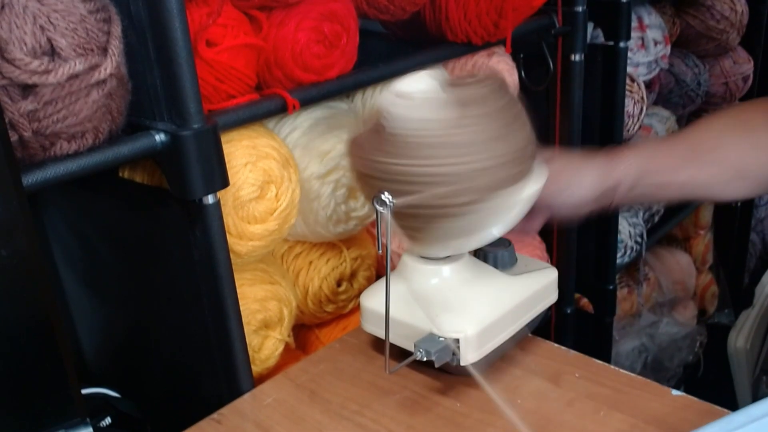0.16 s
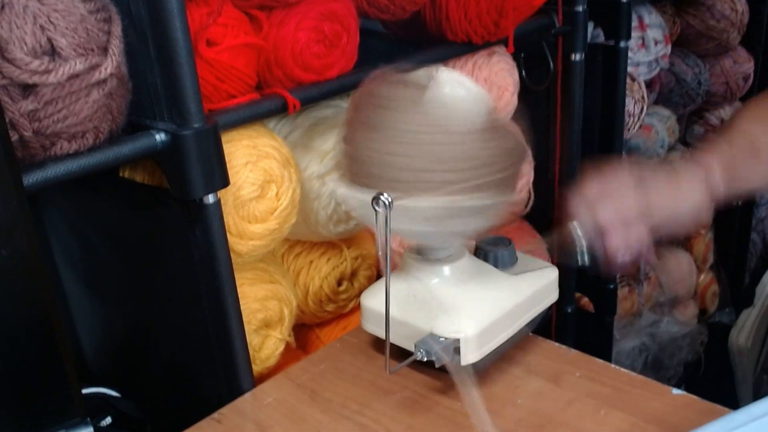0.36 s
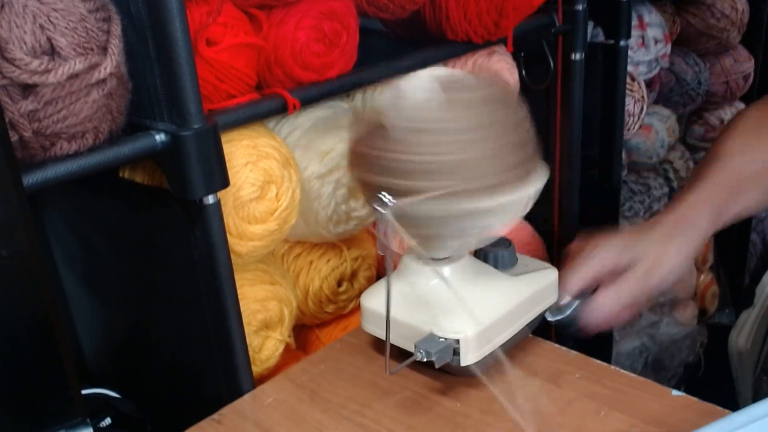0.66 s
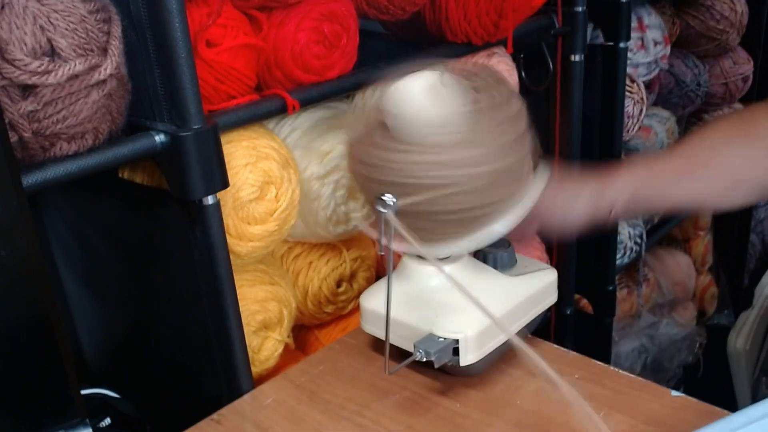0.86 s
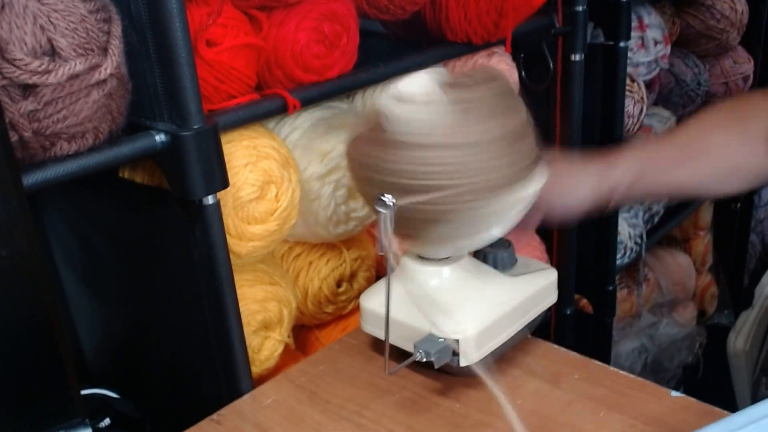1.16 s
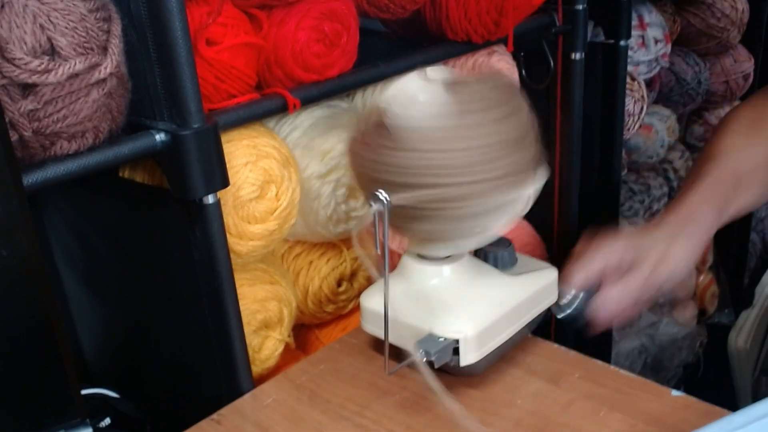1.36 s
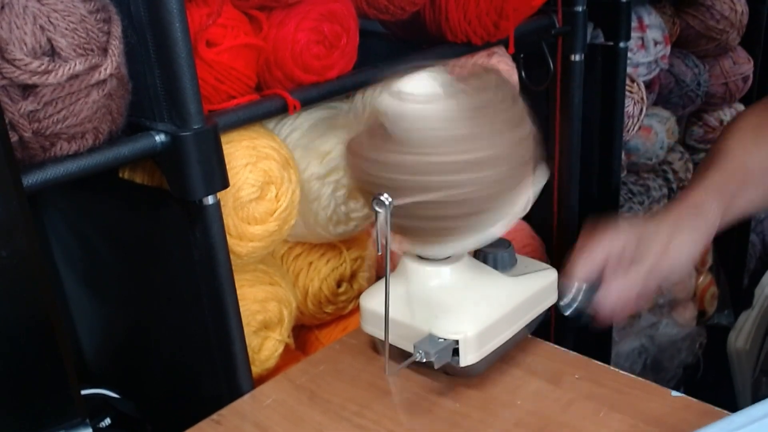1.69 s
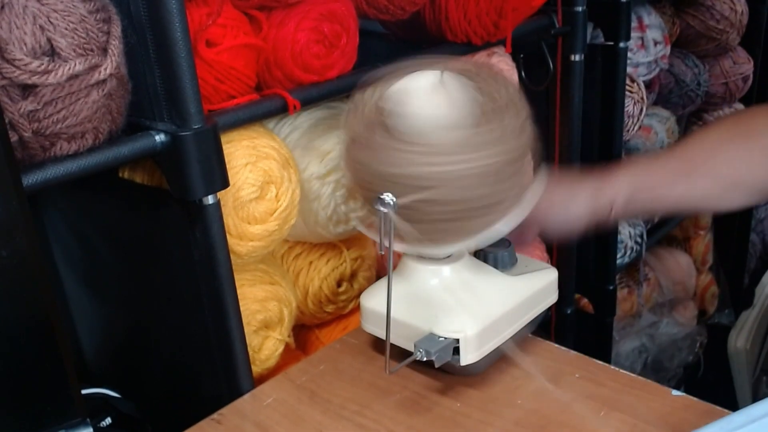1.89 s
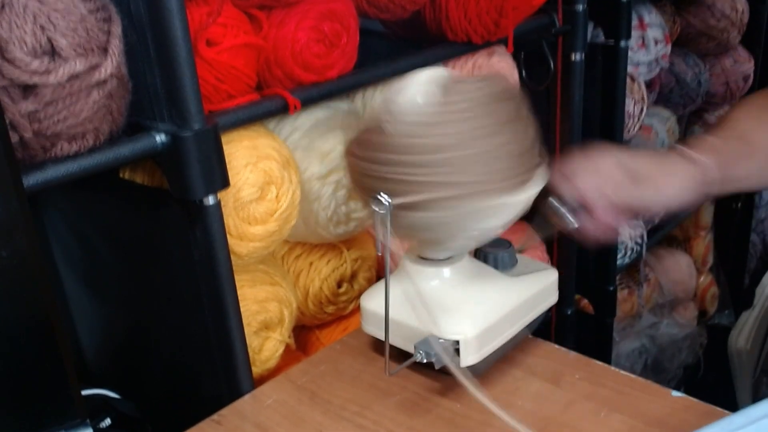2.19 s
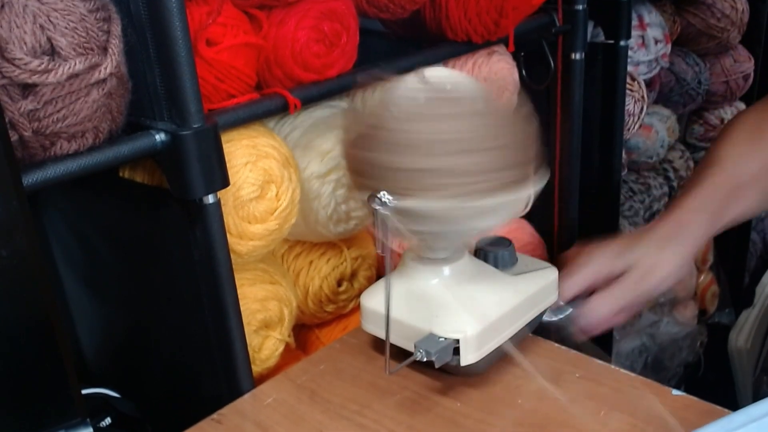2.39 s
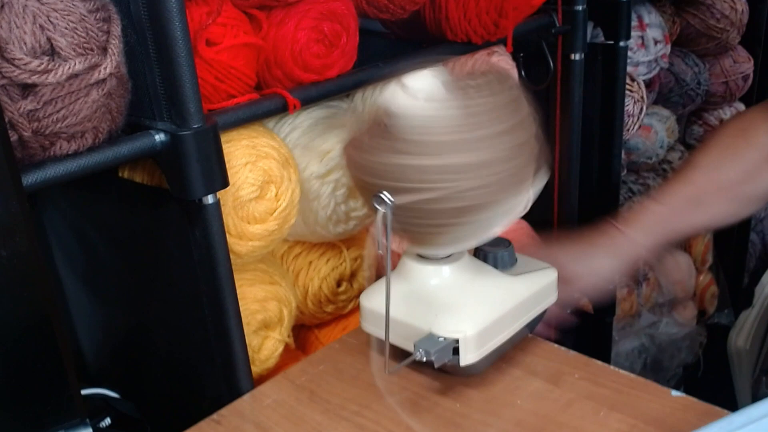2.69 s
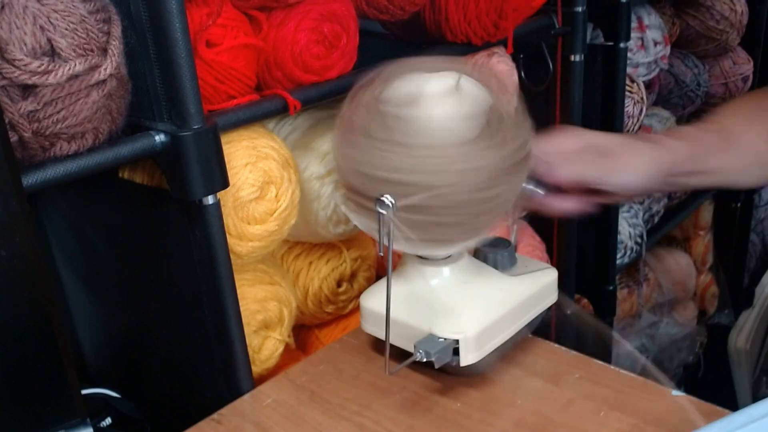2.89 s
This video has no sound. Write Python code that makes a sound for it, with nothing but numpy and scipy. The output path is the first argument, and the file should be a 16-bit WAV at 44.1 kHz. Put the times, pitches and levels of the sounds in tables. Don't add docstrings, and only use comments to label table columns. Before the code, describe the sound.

Close, narrow, slightly dull capture of a plastic winder on a wooden table: throbbing gear hum, rumble, dry ticking rattles and a few knocks midway, thinning and quietening towards the end without stopping.

```python
import sys
import numpy as np
from scipy import signal
from scipy.io import wavfile
from scipy.ndimage import uniform_filter1d

SR = 44100
rng = np.random.default_rng(int(sys.argv[2]) if len(sys.argv) > 2 else 0)


def voltage_ratio(decibels):
    exponent = np.asarray(decibels, float) / 20
    return 10 ** exponent


def digitize_waveform(pressure):
    field = np.atleast_2d(pressure).T
    bounded = np.clip(field, -1, 1)
    quanta = np.round(bounded * 32767).astype(np.int16)
    wavfile.write(sys.argv[1], SR, quanta)


N = 134505

# (time [s], level [dB])
CRANK_EFFORT = [
    (0, -44.5),
    (.4, -51),
    (1.4, -50),
    (1.698, -55.5),
    (2.502, -57.5),
    (3.05, -56),
]
# (time [s], level [dB], tooth rate [Hz], length [s])
BALL_SWINGS = [(0.137, -34.5, 145, 0.017), (0.272, -32, 165.1, 0.093), (0.333, -31, 171.6, 0.032),
               (0.387, -31, 172.9, 0.02), (0.46, -49, 139.9, 0.026), (0.53, -39, 161, 0.021),
               (0.604, -30, 171.3, 0.056), (0.689, -30, 176.5, 0.029), (0.753, -32, 180.4, 0.025),
               (0.795, -40, 159.9, 0.015), (0.825, -54.5, 151.8, 0.017), (0.896, -34, 171.1, 0.026),
               (0.939, -26, 187.4, 0.029), (1.025, -27.5, 180.6, 0.027), (1.092, -26, 192.4, 0.027),
               (1.14, -39.5, 170.6, 0.015), (1.2, -40, 141.5, 0.068), (1.262, -36.5, 167.4, 0.018),
               (1.301, -27, 180.5, 0.027), (1.371, -29, 180.3, 0.036), (1.439, -29, 182.1, 0.037),
               (1.48, -41.5, 185.6, 0.015), (1.519, -42, 145, 0.027), (1.563, -38.5, 153.2, 0.02),
               (1.648, -30.5, 171.3, 0.043), (1.718, -35, 169.7, 0.036), (1.808, -35.5, 173.9, 0.021),
               (1.858, -50.5, 135.7, 0.03), (1.93, -46.5, 149.9, 0.014), (2.018, -32.5, 176, 0.046),
               (2.084, -28.5, 191.2, 0.018), (2.149, -44, 175.7, 0.043), (2.211, -57, 134.4, 0.016),
               (2.276, -46.5, 152.9, 0.033), (2.384, -34, 172.5, 0.045), (2.461, -38.5, 170.4, 0.033),
               (2.529, -34, 187, 0.019), (2.648, -50, 141, 0.042), (2.751, -38, 172.5, 0.052),
               (2.809, -41.5, 173.2, 0.035), (2.88, -50, 169.7, 0.016), (2.971, -55, 152.2, 0.04)]
# (time [s], level [dB], length [s])
WHIRRS = [
    (.12, -52.5, 0.023),
    (0.588, -50, 0.061),
    (.87, -50, .07),
    (1.188, -57, .04),
    (1.873, -52, 0.027),
    (2.24, -52.5, .04),
]
# (time [s], peak level [dB], pitch [Hz])
BASE_RINGS = [(0.049, -39, 627), (0.133, -34.5, 634.7), (0.162, -34.5, 632), (0.2, -37.5, 643.4),
              (0.264, -33, 678), (0.339, -41.5, 719), (0.484, -45, 611.4), (0.521, -36, 703),
              (0.573, -33, 632), (0.669, -37.5, 623), (0.81, -45, 731), (0.935, -38, 770),
              (0.994, -37, 661), (1.083, -47.5, 789), (1.192, -43.5, 669.2), (1.24, -36.5, 675),
              (1.277, -35, 641.4), (1.341, -37, 645.5), (1.532, -40, 678), (1.581, -42, 651),
              (1.681, -39, 630), (1.724, -47, 681), (1.843, -44, 721), (1.899, -41.5, 659),
              (2.069, -46, 624.6), (2.218, -45.5, 721), (2.306, -40, 697.4), (2.44, -42, 670),
              (2.786, -48.5, 624)]
# (time [s], level [dB], length [s], pitch [Hz])
CASE_WHINES = [(0.111, -58, 0.12, 1544), (0.252, -47.5, 0.061, 1560), (0.342, -51.5, 0.035, 1546),
               (0.545, -52, 0.047, 1575), (0.619, -44, 0.018, 1560), (0.727, -60, 0.066, 1584),
               (0.89, -49, 0.044, 1558), (0.967, -47, .04, 1581), (1.035, -44.5, .015, 1530),
               (1.1, -59, .03, 1604), (1.257, -54, 0.026, 1568), (1.313, -44, .03, 1565),
               (1.384, -55.5, .026, 1515), (1.445, -57.5, 0.022, 1590), (1.541, -56, .03, 1490),
               (1.623, -52.5, .045, 1576), (1.672, -43.5, 0.023, 1545), (1.731, -56, 0.044, 1530),
               (2.041, -50, 0.023, 1556), (2.394, -51, 0.035, 1552), (2.519, -61, 0.014, 1600),
               (2.686, -61, 0.034, 1568), (2.765, -58.5, 0.036, 1557)]
# (time [s], level [dB])
TABLE_SWAYS = [(0.302, -48), (0.397, -44), (0.756, -43.5), (1.061, -46), (1.193, -44.5), (1.312, -51),
               (1.457, -44.5), (1.672, -47), (2.041, -50.5), (2.545, -49), (2.724, -62)]
# (frequency [Hz], level [dB per Hz])
FRAME_RUMBLE = [(25, -13), (60, -9), (120, 1.5), (260, -7.5), (470, -11), (570, -17), (800, -11),
                (1300, -30.5)]
# (frequency [Hz], level [dB per Hz])
YARN_HISS = [(1300, -1.5), (1830, -16), (2360, -18), (3600, -15.5), (4400, -33.5), (5800, -22), (6900, -24),
             (8000, -45)]
# (time [s], peak level [dB], length [s])
SPINDLE_RATTLES = [(0.026, -54, 0.005), (0.03, -48, 0.011), (0.082, -48.5, 0.011), (0.1, -52, 0.004),
                   (0.146, -55, 0.012), (0.191, -35, 0.0033), (0.211, -40, 0.0068), (0.2396, -34.5, 0.0072),
                   (0.263, -29.5, 0.0084), (0.2766, -29, 0.0138), (0.328, -27.5, 0.0078),
                   (0.346, -33, 0.0056), (0.437, -47.5, 0.015), (0.4984, -42.5, 0.015),
                   (0.565, -36.5, 0.0042), (0.591, -43, 0.014), (0.618, -40, 0.006), (0.6688, -34, 0.024),
                   (0.7809, -46, 0.014), (0.8756, -37.5, 0.0049), (0.954, -28.5, 0.0063),
                   (0.984, -39, 0.0065), (1.0034, -36, 0.02), (1.037, -32, 0.0033), (1.069, -35, 0.0053),
                   (1.1044, -36.5, 0.0082),
                   (1.1458, -39.5, 0.011), (1.19, -51, 0.014), (1.2388, -45, 0.0094), (1.3294, -41, 0.0046),
                (1.3764, -36, 0.0093), (1.4032, -46, 0.0037), (1.4113, -43, 0.0041),
                (1.4265, -36.5, 0.0039), (1.4455, -28.5, 0.0042), (1.5176, -34.5, 0.014),
                (1.54, -37, 0.004), (1.548, -34, 0.008), (1.6142, -48, 0.008), (1.73, -39.5, 0.014),
                (1.754, -40.5, 0.013), (1.859, -46, 0.0074), (2.036, -43.5, 0.0099), (2.0498, -37, 0.0097),
                (2.0831, -52, 0.0051), (2.0966, -38, 0.0039), (2.1852, -44, 0.01), (2.2735, -46.5, 0.0047),
                (2.4204, -36.5, 0.011), (2.4419, -42, 0.011), (2.4595, -35.5, 0.0077),
                (2.5243, -42, 0.0057), (2.6563, -49.5, 0.0084), (2.734, -51.5, 0.0059),
                (2.799, -55, 0.0059), (2.9139, -56, 0.0053), (2.996, -51, 0.0049), (2.9362, -46.5, 0.013)]
# (frequency [Hz], level [dB], decay time t60 [s])
SPINDLE_MODES = [(2816, -10, 0.014), (3123, -8, .014), (3495, -3, 0.013), (3840, -1.5, 0.013),
                 (4634, -22.5, 0.03), (5733, -10.5, 0.011), (6026, -11.5, 0.01), (6865, -20.5, 0.01)]
# (time [s], peak level [dB])
YARN_SNAPS = [
    (.163, -40),
    (1.2315, -48.5),
    (1.731, -50.5),
    (2.144, -56.5),
    (2.217, -51.5),
    (2.5227, -44),
]
# (time [s], level [dB])
SECOND_HARMONIC_SWELLS = [
    (0.316, -40),
    (1.023, -42.5),
    (1.482, -47),
    (1.72, -48.5),
    (2.088, -45),
    (2.254, -51.5),
    (2.458, -47.5),
    (2.556, -50.5),
    (2.804, -50.5),
]
# (time [s], level [dB], length [s], pitch [Hz])
YARN_SQUEAKS = [
    (1.3, -60, 0.075, 2900),
    (2.6, -63.5, .05, 2000),
    (2.24, -58, 0.052, 1140),
    (0.537, -50.5, 0.059, 1200),
    (1.5, -53, 0.023, 1020),
]
# (time [s], peak level [dB])
CLAMP_KNOCKS = [
    (1.124, -38),
    (1.139, -29.5),
    (1.4771, -32),
    (1.491, -28),
    (1.504, -29),
]
# (frequency [Hz], level [dB], decay time t60 [s])
CLAMP_MODES = [(1162, -9, 0.038), (2123, -16, 0.015), (2240, -22, 0.014), (3150, -10.5, 0.0067),
               (3950, -18.5, .008), (4860, -22.5, .008)]


def rms_one(x):
    return x / np.sqrt(np.mean(np.abs(x) ** 2) + 1e-20)


def clock():
    return np.arange(N) / SR


def drift(rate_hz):
    r = np.exp(-80 * np.pi * rate_hz / SR)
    slow = signal.lfilter([1], [1, -2 * r, r * r], rng.standard_normal(N // 40 + 2002))[2000:]
    return np.interp(np.arange(N) / 40, np.arange(len(slow)), rms_one(slow))


def swells(s, db, length, rest):
    distance = (clock() - s[:, None]) / np.reshape(length, (-1, 1))
    bells = voltage_ratio(db)[:, None] * voltage_ratio(-16 * distance ** 2)
    return np.sqrt(np.sum(bells ** 2, axis=0) + rest ** 2)


def effort():
    s, db = np.transpose(CRANK_EFFORT)
    return voltage_ratio(np.interp(clock(), s, db))


def tooth_turns():
    s, _, hz, _ = np.transpose(BALL_SWINGS)
    wander_hz = 5.0 * drift(12)
    return np.cumsum(np.interp(clock(), s, hz) + wander_hz) / SR


def hum_gain():
    s, db, _, length = np.transpose(BALL_SWINGS)
    return swells(s, db, length, effort() * voltage_ratio(-14.5 + 9.5))


def hum(turns, gain, push):
    overtones = []
    for k in range(4):
        level = voltage_ratio(3 * drift(12) - 5 * k)
        overtones.append(level * np.sin(2 * np.pi * ((k + 3) * turns + 0.16 * drift(16.5))))
    whirr = swells(*np.transpose(WHIRRS), 0) * overtones[0]
    tone = gain * np.sin(2 * np.pi * turns)
    return np.sqrt(2) * (tone + whirr) + push * voltage_ratio(-4) * sum(overtones)


def struck(turns, hz, width_hz):
    spread_db, evenness = 7, 0.61
    hit = np.diff(np.floor(turns * 2), prepend=0) > 0
    kicks = hit * voltage_ratio(spread_db * rng.standard_normal(N)) * np.exp(2j * np.pi * rng.random(N))
    r = np.exp(-np.pi * width_hz / SR)
    slow = signal.lfilter([1], [1, -2 * r, r * r], kicks + 1e-18)
    level = uniform_filter1d(np.abs(rms_one(slow)), size=600)
    slow = slow / (level + 0.064) ** evenness
    carrier = np.exp(2j * np.pi * np.cumsum(hz + np.zeros(N)) / SR)
    return np.sqrt(2) * np.real(rms_one(slow) * carrier)


def base(turns, push):
    rise_s = 0.0191
    s, db, hz = np.transpose(BASE_RINGS)
    age = np.maximum(clock() - s[:, None] + 0.0046, 0) / rise_s
    rings = voltage_ratio(db - 5)[:, None] * age * np.exp(1 - age)
    gain = np.sqrt(np.sum(rings ** 2, axis=0))
    ringing = gain * struck(turns, np.interp(clock(), s + rise_s, hz), width_hz=37)
    rest = struck(turns, 635, width_hz=46) + voltage_ratio(-6) * struck(turns, 770, width_hz=70)
    return ringing + push * voltage_ratio(-2) * rest


def gear_case(turns, push):
    s, db, length, hz = np.transpose(CASE_WHINES)
    gain = swells(s, db, length, push * voltage_ratio(-11.5))
    return gain * struck(turns, np.interp(clock(), s, hz), width_hz=88.6)


def table_sway(turns, push):
    gain = swells(*np.transpose(TABLE_SWAYS), 0.047, push * voltage_ratio(-7))
    return gain * struck(turns, 79.54, width_hz=17)


def banded(spectrum, patchy_db):
    hz, db = np.transpose(spectrum)
    edges = hz[0] * 2 ** np.arange(0, np.log2(hz[-1] / hz[0]), 1 / 3)
    out, together = 0, drift(20.0)
    white = rng.standard_normal((2, N))
    for k, (low, high) in enumerate(zip(edges, edges[1:])):
        band_filter = signal.butter(2, [low, high], "band", fs=SR, output="sos")
        band = signal.sosfilt(band_filter, white[k % 2])
        level_db = np.interp(np.log(low * high) / 2, np.log(hz), db)
        flicker = np.minimum(0.5 * together + drift(11.4), 1)
        out = out + band * voltage_ratio(level_db + patchy_db * flicker)
    return rms_one(out)


def frame_and_yarn(push):
    rumble = voltage_ratio(5.5) * banded(FRAME_RUMBLE, patchy_db=4.5)
    hiss = voltage_ratio(-10.5) * banded(YARN_HISS, patchy_db=5.0)
    return push * (rumble + hiss)


def ring(clicks, hz, t60):
    r, w = voltage_ratio(-60 / (t60 * SR)), 2 * np.pi * hz / SR
    return signal.lfilter([0, np.sin(w)], [1, -2 * r * np.cos(w), r * r], clicks + 1e-18)


def strike(s, db, modes, spread_db, bed=0, soft=0):
    out = np.zeros(N)
    at = np.minimum((s * SR).astype(int), N - 1).ravel()
    for hz, level_db, t60 in modes:
        clicks = bed * (rng.random(N) < 0.5) * voltage_ratio(level_db + 2 * spread_db * rng.standard_normal(N))
        colour_db = spread_db * (rng.standard_normal((len(s), 1)) + rng.standard_normal(s.shape))
        clicks = clicks + np.bincount(at, voltage_ratio(db + level_db + colour_db).ravel(), N)
        if soft:
            contact_s = t60 * soft
            clicks = ring(clicks, hz, contact_s) * 4 * np.log(1000) / (contact_s * SR)
        out += ring(clicks, hz, t60)
    return out


def spindle(push):
    bounce_s, bounce_loss_db, ticks_per_s = 0.0033, 5.5, 300
    s, db, length = np.transpose(SPINDLE_RATTLES)[:, :, None]
    jitter = 2.0 * rng.random((len(s), 8)) * (np.arange(8) > 0)
    late = bounce_s * (np.arange(8) + jitter)
    fade_db = db - 8 - bounce_loss_db * (2 * late / length - 0.6) ** 2
    tick_db = -15 + 2.3 * np.minimum(rng.exponential(1, N), 4)
    ticks = (rng.random(N) < ticks_per_s / SR) * push * voltage_ratio(tick_db)
    return strike(s + late, fade_db, SPINDLE_MODES, 2.1, ticks, soft=0.45)


def yarn_snaps():
    s, db = np.transpose(YARN_SNAPS)
    clicks = np.bincount((s * SR).astype(int), voltage_ratio(db), N)
    burst = rng.standard_normal(80) * voltage_ratio(-0.4 * np.arange(80))
    bright = signal.butter(2, 2500, "high", fs=SR, output="sos")
    return signal.sosfilt(bright, np.convolve(clicks, burst)[:N])


def second_harmonic(turns):
    return swells(*np.transpose(SECOND_HARMONIC_SWELLS), 0.026, 0) * struck(turns, 388, width_hz=88)


def yarn_squeaks(turns):
    s, db, length, hz = np.transpose(YARN_SQUEAKS)
    roughness = struck(turns, 0, width_hz=50)
    tones = np.zeros(N)
    for k in range(len(s)):
        tones += swells(s[[k]], db[[k]], length[k], 0) * np.cos(2 * np.pi * hz[k] * clock())
    return tones * roughness


def clamp():
    return strike(*np.transpose(CLAMP_KNOCKS)[:, :, None], CLAMP_MODES, 1.5, soft=0.2)


def scene():
    turns, gain = tooth_turns(), hum_gain()
    load = uniform_filter1d(gain, size=3000) / effort()
    push = effort() * (load / load.mean()) ** 0.32
    housing = base(turns, push) + gear_case(turns, push) + table_sway(turns, push) + second_harmonic(turns)
    guide = yarn_snaps() + yarn_squeaks(turns)
    hits = spindle(np.sqrt(push * effort())) + clamp()
    echoes = sum(np.pad(hits, (int(lag_s * SR), 0))[:N] * voltage_ratio(-19) for lag_s in (0.009, 0.017))
    mix = hum(turns, gain, push) + housing + frame_and_yarn(push) + guide + hits + echoes
    return mix[None, :]


def band_limit(x):
    return signal.sosfilt(signal.butter(12, 8070, fs=SR, output="sos"), x)


def record(dry):
    top_cut = signal.butter(14, 7300, fs=SR, output="sos")
    mix = signal.sosfilt(top_cut, dry)
    return band_limit(mix)


dry = scene()
out = record(dry)
digitize_waveform(out)
```